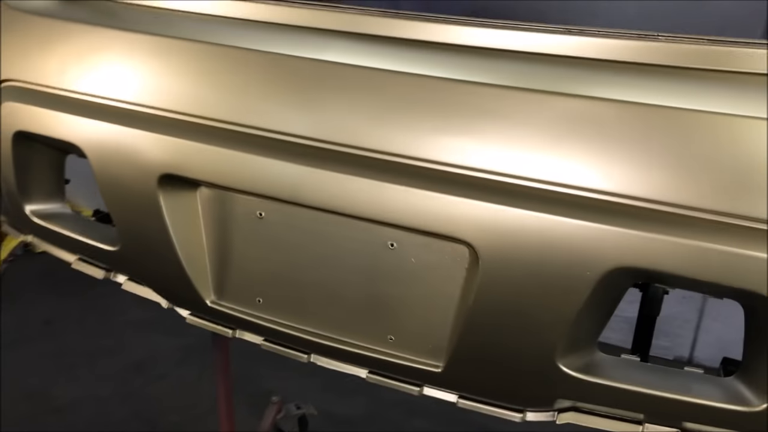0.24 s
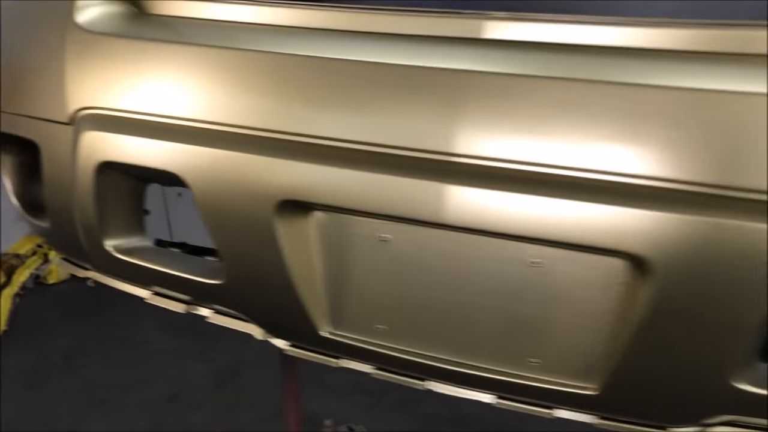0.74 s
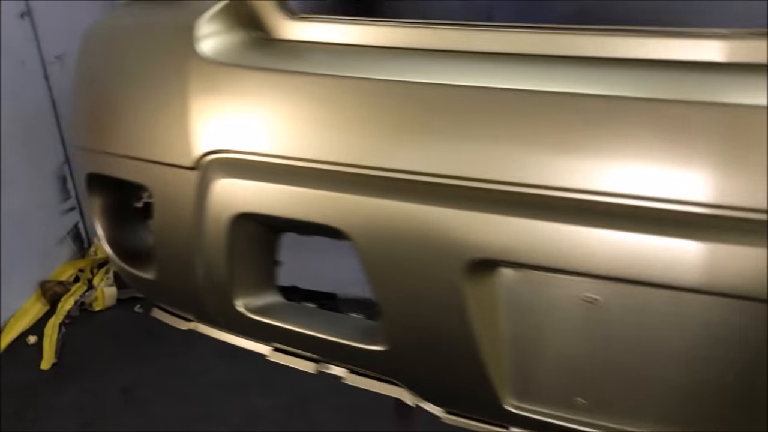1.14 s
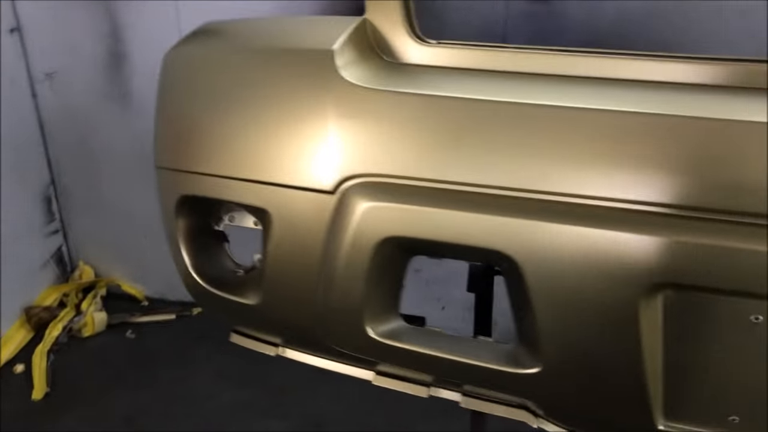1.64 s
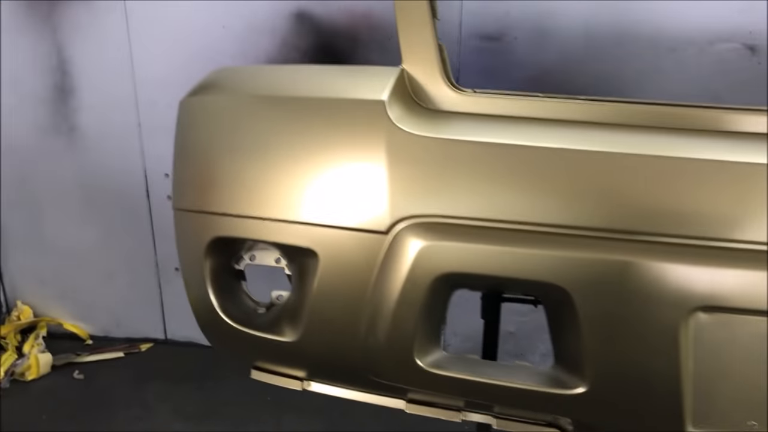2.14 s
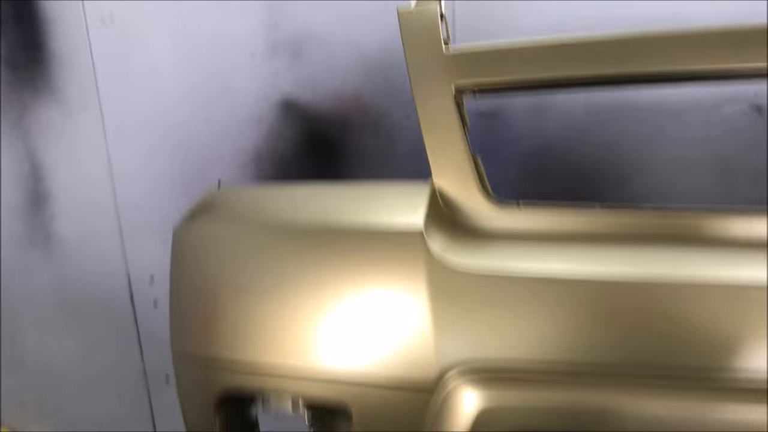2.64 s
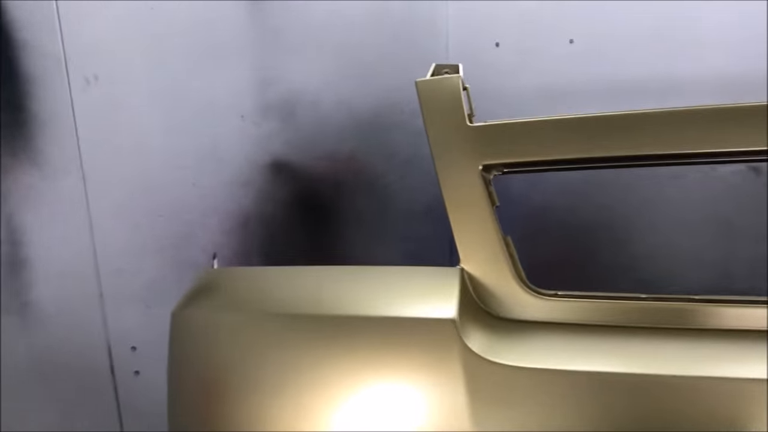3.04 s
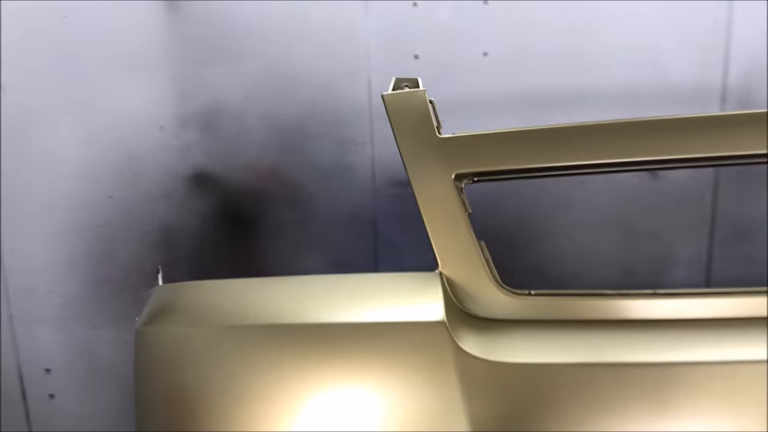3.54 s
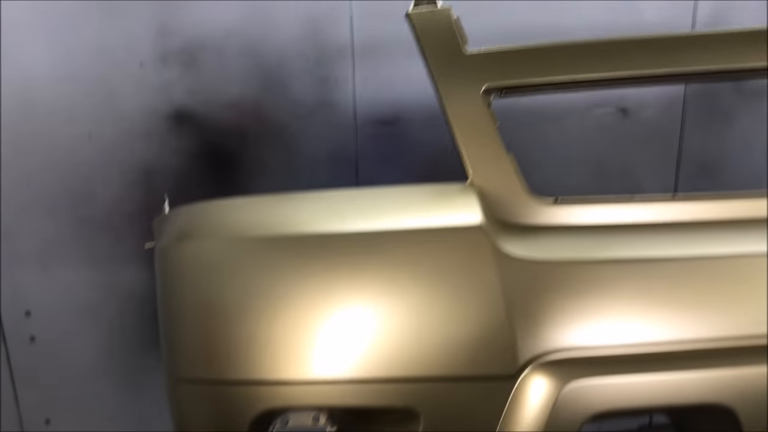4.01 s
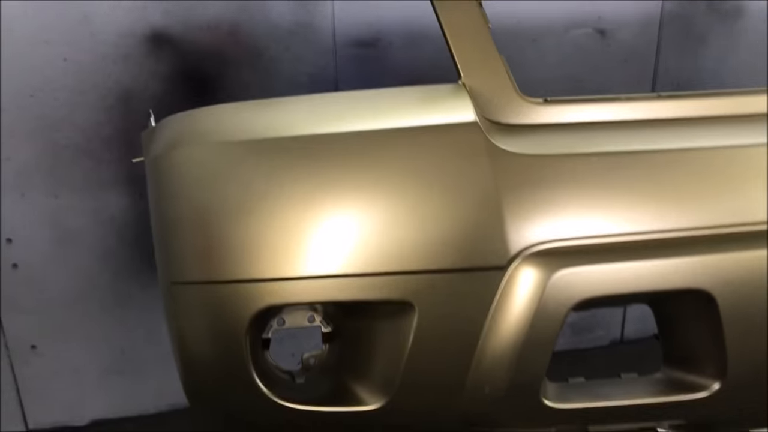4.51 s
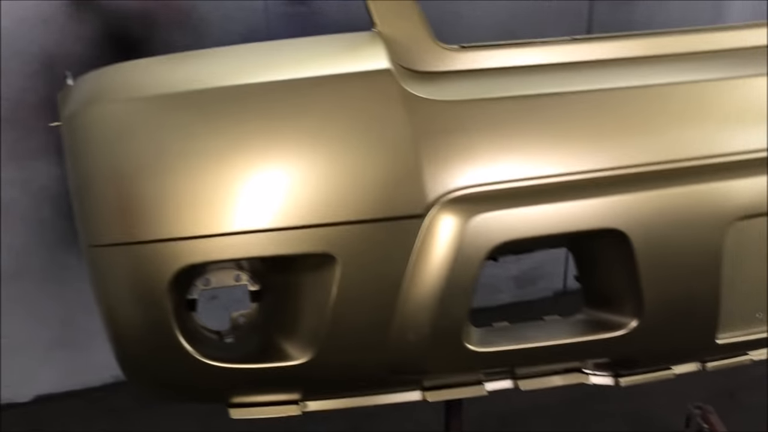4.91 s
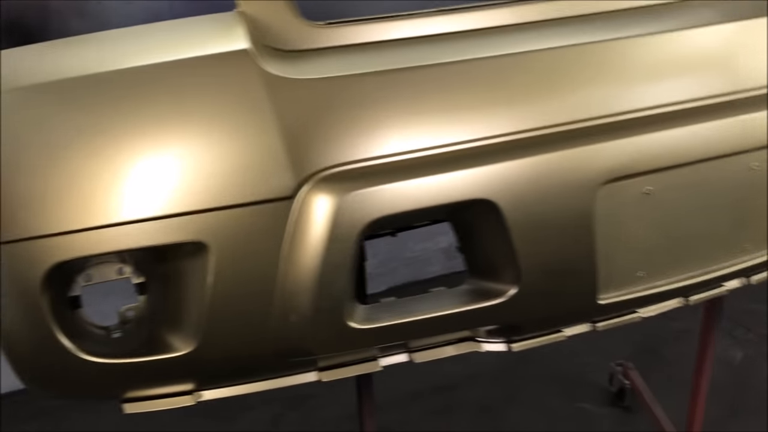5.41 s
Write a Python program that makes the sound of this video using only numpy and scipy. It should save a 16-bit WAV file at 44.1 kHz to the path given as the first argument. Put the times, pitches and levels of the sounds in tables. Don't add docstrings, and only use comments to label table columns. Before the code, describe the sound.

A large extractor fan drones in a metal paint booth, its low hum swelling and sinking over rumble and soft air hiss.

```python
import sys
import numpy as np
from scipy import signal
from scipy.fft import rfft, irfft, next_fast_len
from scipy.io import wavfile

SR = 44100
rng = np.random.default_rng(int(sys.argv[2]) if len(sys.argv) > 2 else 0)


def unload_wav(signal):
    wavfile.write(
        sys.argv[1],
        SR,
        np.round(np.clip(np.atleast_2d(signal).T, -1, 1) * 32767).astype(np.int16),
    )


def volts_from_decibels(level):
    exponent = np.asarray(level, float) / 20
    return 10 ** exponent


N = 249606

# t/s, level/dB
HUM = [(0, -21.5), (.2, -16), (.4, -12.5), (.75, -11.5), (1.1, -16.5), (1.5, -16.5), (1.85, -16.5),
       (2.02, -19), (2.25, -27.5), (2.6, -27), (2.85, -16), (3.2, -17), (3.6, -17), (3.78, -25.5),
       (4.05, -17.5), (4.6, -18.5), (5.2, -21), (5.66, -24.5)]
# t/s, level/dB, half width/s
FIRST_ZONES = [
    (.6, -27, 0.18),
    (1.45, -37, .25),
    (2.2, -24.5, 0.28),
    (2.9, -27.5, 0.29),
    (3.6, -25.5, 0.26),
    (4.2, -29, 0.17),
    (5.0, -30, 0.32),
]
# t/s, level/dB, half width/s
THIRD_ZONES = [
    (0.01, -25, 0.16),
    (1.4, -27.5, .25),
    (2.15, -30, 0.13),
    (2.8, -29, .25),
    (4.2, -28.5, .15),
    (4.65, -28, 0.19),
    (5.15, -33.5, 0.18),
]
UPPER_MULTIPLES = (4, 5, 6, 7, 11, 13, 15)
# t/s, level/dB, half width/s
UPPER_ZONES = [
    [(.3, -37, 0.32), (1.95, -40.5, 0.24), (4.8, -39, 0.26), (5.6, -41, 0.13)],
    [(0.01, -49, 0.34), (1.9, -51, .3), (3.3, -47.5, .3), (5.3, -46.5, 0.27)],
    [(2.55, -42.5, 0.27), (3.6, -41, 0.16)],
    [(.4, -51, 0.27), (3.4, -49.5, 0.62)],
    [(1.2, -58, 0.21), (4.9, -51.5, 0.4)],
    [],
    [],
]
UPPER_QUIET_DB = (-57.5, -54.5, -54, -57.5, -62, -68.5, -68)
# t/s, level/dB, half width/s
SHAFT_ZONES = [
    (2.7, -41, 0.49),
    (4.6, -39, 0.86),
]
# t/s, level/dB, half width/s
BELT_ZONES = [
    (.4, -38.5, 0.66),
    (4.0, -37.5, 0.55),
]
# f/Hz, width/Hz, level/dB
LOW_MODES = [(104.3, 13, -1.5), (114.1, 12, -2.5), (127.4, 8.4, -4.5), (142, 6.4, -7)]
# t/s, level/dB, half width/s
LOW_SWELLS = [
    (.3, -27.5, 0.38),
    (1.5, -26, 0.22),
    (2.2, -28, 0.24),
    (3.45, -29, 0.27),
    (4.25, -31.5, 0.1),
    (5.08, -29.5, 0.053),
    (5.36, -24, 0.053),
    (5.62, -23.5, 0.079),
]
# f/Hz, width/Hz, level/dB
MIDDLE_MODES = [(164.5, 8.6, -1.5), (179, 7.7, 3.5), (203.3, 6.9, 0.5), (210.6, 10.5, -4.5)]
# t/s, level/dB, half width/s
MIDDLE_SWELLS = [(.02, -27.5, .1), (.5, -30, .2), (1.9, -28.5, 0.14), (2.25, -30, 0.048), (2.6, -28.5, .25),
                 (3.45, -30.5, 0.12), (3.92, -31, 0.066), (4.38, -29, 0.082), (4.78, -27, 0.083),
                 (5.36, -26, 0.091), (5.62, -29, 0.065)]
# f/Hz, width/Hz, level/dB
HIGH_MODES = [(245, 34, 3.5), (271, 42, 4.5), (292.2, 15, 0.5), (308, 10, -2), (321.5, 35, -3),
              (344, 14, 2), (370.7, 14, -3.5)]
# f/Hz, width/Hz, level/dB
DUCT_MODES = [(639, 22, -3.5), (681, 25, -5), (715, 25, -3)]
# t/s, level/dB, half width/s
DUCT_ZONES = [
    (1.17, -44, .15),
    (2.14, -37.5, 0.078),
    (3.85, -38, 0.17),
    (4.85, -42, 0.25),
]
# f/Hz, density/dB
BED = [(15, -14), (27, -8), (38, -11), (48, -12), (63, 3), (75, -9), (92, -3), (158, -0.5), (300, 6),
       (400, -4.5), (520, -25)]
# f/Hz, density/dB
ROAR = [(330, -12), (420, 5), (520, -1.5), (730, -3.5), (1000, -6), (1400, -10), (1650, -15), (1900, -19),
        (2600, -22), (4000, -27), (6500, -26.5), (9000, -24.5), (12000, -27)]
# f/Hz, width/Hz, level/dB
NOTCHES = [(4900, 320, -3), (7870, 1100, -4), (10250, 850, -6.5)]
# f/Hz, level/dB
TOP = [(12000, 0), (14000, -2.2), (15800, -4.5)]
STARVED = [(4, 2), (18, 1), (23, 1), (41, 1), (55, 1), (58, 1), (61, 1), (63, 1), (70, 1), (72, 1), (79, 1),
           (94, 2), (97, 1), (115, 1), (132, 1), (136, 1), (142, 1), (145, 1), (176, 1), (185, 1), (192, 1),
           (203, 1), (205, 1), (208, 1), (213, 1), (238, 2), (255, 1), (262, 1)]
# f/Hz, step/dB
STARVED_STEP = [(20, -40), (470, -40), (600, -43), (1000, -48), (1500, -51), (2200, -54), (4000, -57),
                (20000, -57)]

BLADE_HZ, SHAFT_HZ, BELT_HZ, PAIR_HZ, WHINE_HZ = 148.72, 49.6, 54.15, (74.4, 79.04), 2750.2
PAIR_DB, WHINE_DB = -39.5, -65
FIRST_QUIET_DB, THIRD_QUIET_DB, SHAFT_QUIET_DB, BELT_QUIET_DB, DUCT_QUIET_DB = -48.5, -52, -55, -43.5, -46
LOW_MODES_DB, MIDDLE_MODES_DB, HIGH_MODES_DB = -27, -32, -24.5
BED_DB, ROAR_DB, ROAR_TRIM_DB = -34, -31.5, 2.5
THROB_S = -.04
PATH_SWAY_TURNS = .05
BOOTH_T60_S, BOOTH_DB, PLACES = .5, -3, 12
GAIN_SHARE, GAIN_S, GAIN_REST_DB = 0.49, 0.36, -14.5
FRAME, FRAME_SR_HZ, FRAME_OFFSET = 1024, 48000, 7
TREBLE_HZ, CUTOFF_HZ = 2100, 15800
SURVIVORS, SURVIVOR_TILT = 4, .12


def blades():
    first_db = zones(FIRST_ZONES, FIRST_QUIET_DB)
    third_db = zones(THIRD_ZONES, THIRD_QUIET_DB)
    multiples = list(enumerate([first_db, *in_time(HUM), third_db], 1))
    for k, rows, quiet_db in zip(UPPER_MULTIPLES, UPPER_ZONES, UPPER_QUIET_DB):
        multiples.append((k, zones(rows, quiet_db) + 1.3 * drift(2.4)))
    out = 0
    for k, level_db in multiples:
        sway = rng.random() + PATH_SWAY_TURNS * np.sqrt(k) * drift(0.78)
        out = out + tone(k * BLADE_HZ, level_db, sway)
    return out


def drive():
    pair = sum(tone(hz, PAIR_DB, PATH_SWAY_TURNS * drift(.5)) for hz in PAIR_HZ)
    shaft = tone(SHAFT_HZ, zones(SHAFT_ZONES, SHAFT_QUIET_DB), 0)
    belt = tone(BELT_HZ, zones(BELT_ZONES, BELT_QUIET_DB), 0)
    whine = tone(WHINE_HZ, WHINE_DB + 3.0 * drift(1.5), 0.3 * drift(2.5))
    return shaft + belt + pair + whine


def airflow():
    low = volts_from_decibels(zones(LOW_SWELLS, LOW_MODES_DB)) * booth_modes(LOW_MODES, swing_db=-1.0)
    middle = volts_from_decibels(zones(MIDDLE_SWELLS, MIDDLE_MODES_DB)) * booth_modes(MIDDLE_MODES, swing_db=-2.0)
    high = volts_from_decibels(HIGH_MODES_DB) * booth_modes(HIGH_MODES, swing_db=0.0)
    duct = volts_from_decibels(zones(DUCT_ZONES, DUCT_QUIET_DB)) * booth_modes(DUCT_MODES, swing_db=-0.5)
    bed = volts_from_decibels(BED_DB) * broad(BED)
    roar = booth(volts_from_decibels(ROAR_DB + ROAR_TRIM_DB) * broad(ROAR))
    return low + middle + high + duct + bed + roar


def booth_modes(modes, swing_db):
    out = 0
    for hz, width_hz, db in modes:
        ringing = shaped_noise(lambda f: 1 / (1 + (2 * (f - hz) / width_hz) ** 2))
        out = out + volts_from_decibels(db + swing_db * drift(0.28)) * ringing
    return rms_one(out)


def booth(x):
    t = np.arange(SR // 2) / SR
    places_per_sample = (PLACES - 1) / N
    place = np.arange(N) * places_per_sample
    out = 0
    for k in range(PLACES):
        echoes = rng.standard_normal(len(t)) * volts_from_decibels(-60 * t / BOOTH_T60_S)
        echoes *= volts_from_decibels(BOOTH_DB) / np.sqrt(np.sum(echoes ** 2))
        start = max(int((k - 1) / places_per_sample), 0)
        stop = min(int((k + 1) / places_per_sample), N)
        fed = np.roll(x, len(t) - start)[:stop - start + len(t)]
        heard = np.zeros(N)
        heard[start:stop] = signal.fftconvolve(fed, echoes, "valid")[1:]
        out = out + heard * np.cos(np.pi / 2 * np.clip(place - k, -1, 1))
    return (x + out) / np.sqrt(1 + volts_from_decibels(2 * BOOTH_DB))


def zones(rows, quiet_db):
    t = np.arange(N) / SR
    swells = sum(volts_from_decibels(db) * np.exp(-.5 * ((t - s) / width_s) ** 2) for s, db, width_s in rows)
    return 20 * np.log10(volts_from_decibels(quiet_db) + swells)


def tone(hz, level_db, sway):
    turns = hz * (np.arange(N) / SR - THROB_S) + sway
    return np.sqrt(2) * volts_from_decibels(level_db) * np.sin(2 * np.pi * turns)


def drift(rate_hz):
    r = np.exp(-80 * np.pi * rate_hz / SR)
    slow = signal.lfilter([1], [1, -2 * r, r * r], rng.standard_normal(N // 40 + 2002))[2000:]
    return np.interp(np.arange(N) / 40, np.arange(len(slow)), rms_one(slow - slow.mean()))


def shaped_noise(gain_at):
    size = next_fast_len(N)
    hz = np.maximum(np.arange(size // 2 + 1) * SR / size, 1)
    return rms_one(irfft(rfft(rng.standard_normal(size)) * gain_at(hz), size)[:N])


def broad(points):
    return shaped_noise(lambda hz: at_hz(points, hz))


def at_hz(points, hz):
    table_hz, table_db = np.transpose(points)
    return volts_from_decibels(np.interp(np.log(hz), np.log(table_hz), table_db))


def in_time(rows):
    s, *columns = np.transpose(rows)
    return [np.interp(np.arange(N) / SR, s, c) for c in columns]


def rms_one(x):
    return x / np.sqrt(np.mean(x ** 2) + 1e-20)


def scene():
    return (blades() + drive() + airflow())[None]


def port(x):
    for hz, width_hz, db in NOTCHES:
        w = 2 * np.pi * hz / SR
        a = np.tan(np.pi * width_hz / SR)
        g = volts_from_decibels(db / 2)
        x = signal.lfilter([1 + a * g, -2 * np.cos(w), 1 - a * g], [1 + a / g, -2 * np.cos(w), 1 - a / g], x)
    return x


def gain_control(x):
    r = np.exp(-1 / (GAIN_S * SR))
    power, _ = signal.lfilter([1 - r], [1, -r], x ** 2, zi=[volts_from_decibels(2 * GAIN_REST_DB)])
    return x * volts_from_decibels(-GAIN_SHARE * (10 * np.log10(power) - GAIN_REST_DB))


def starve(x):
    fast = signal.resample_poly(x, 160, 147)
    n = np.arange(2 * FRAME) + .5
    window = np.sin(np.pi * n / (2 * FRAME))
    basis = window * np.cos(np.pi / FRAME * np.outer(n[:FRAME], n + FRAME / 2))
    hz = n[:FRAME] * FRAME_SR_HZ / (2 * FRAME)
    frames = np.array([[first + k] for first, run in STARVED for k in range(run)])
    where = FRAME_OFFSET + FRAME * frames + np.arange(2 * FRAME)
    step = at_hz(STARVED_STEP, hz)
    lines = fast[where] @ basis.T / (FRAME * step)
    rounded = np.sign(lines) * np.floor(np.abs(lines) ** .75 + .4054) ** (4 / 3)
    in_treble = (hz > TREBLE_HZ) * (hz < CUTOFF_HZ)
    treble = np.abs(lines) * at_hz(TOP, hz) * hz ** SURVIVOR_TILT * in_treble
    survives = treble >= np.sort(treble, axis=1)[:, [-SURVIVORS]]
    rounded = np.where(survives, np.sign(lines), rounded * (hz < TREBLE_HZ))
    error = np.zeros(len(fast))
    np.add.at(error, where, ((rounded - lines) * step) @ basis * 2)
    return x + signal.resample_poly(error, 147, 160)[:N]


def roll_off(x):
    return signal.sosfilt(signal.butter(12, 16030, fs=SR, output="sos"), x)


def record(dry):
    starved = starve(gain_control(port(dry[0])))
    hz = np.arange(1, N // 2 + 2) * SR / N
    mix = irfft(rfft(starved) * at_hz(TOP, hz) * (hz < CUTOFF_HZ), N)
    return roll_off(mix[None])


dry = scene()
out = record(dry)
unload_wav(out)
```